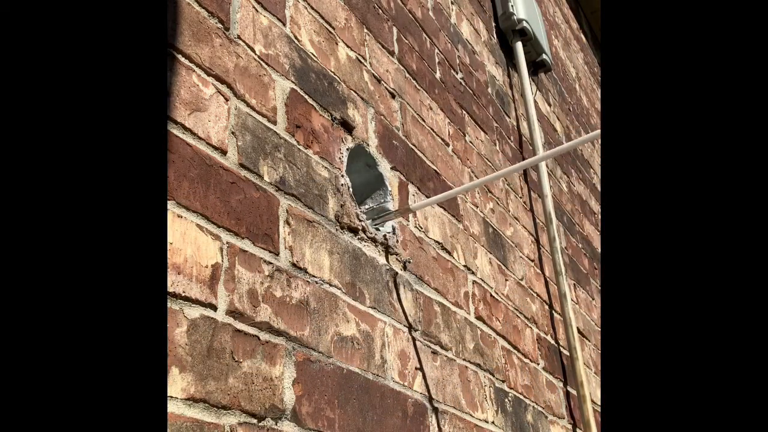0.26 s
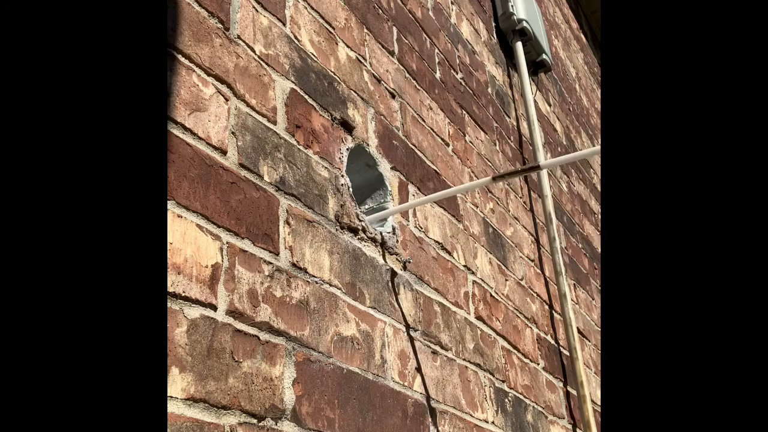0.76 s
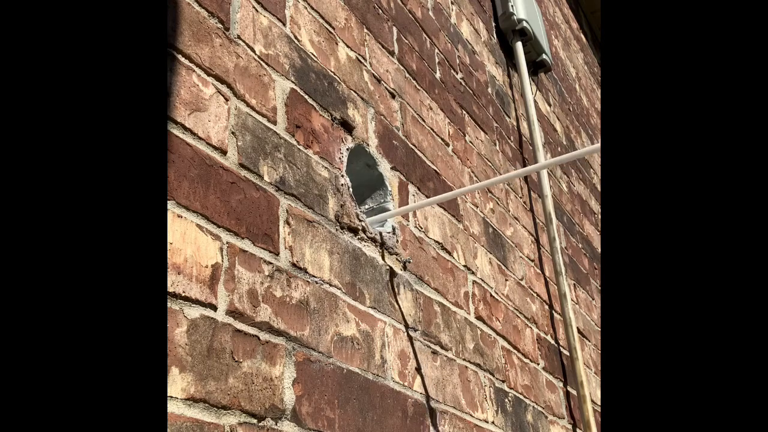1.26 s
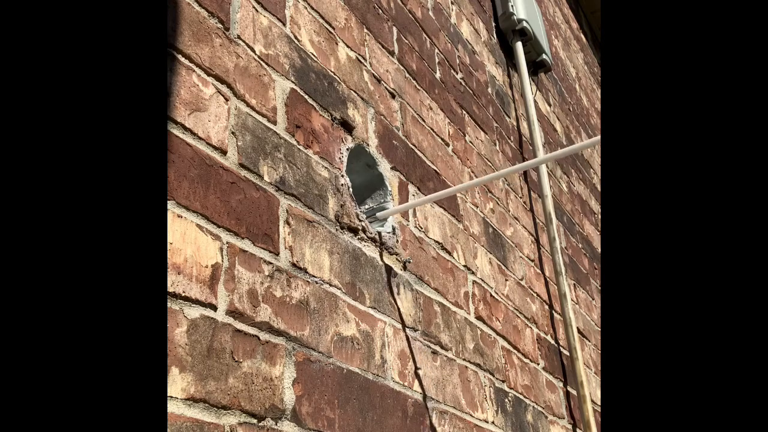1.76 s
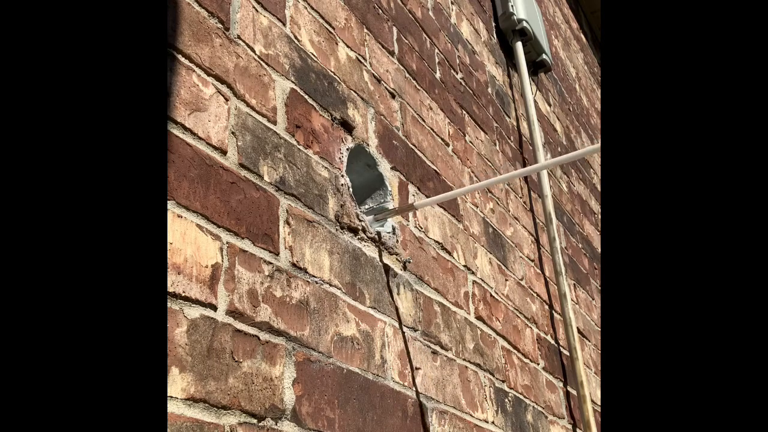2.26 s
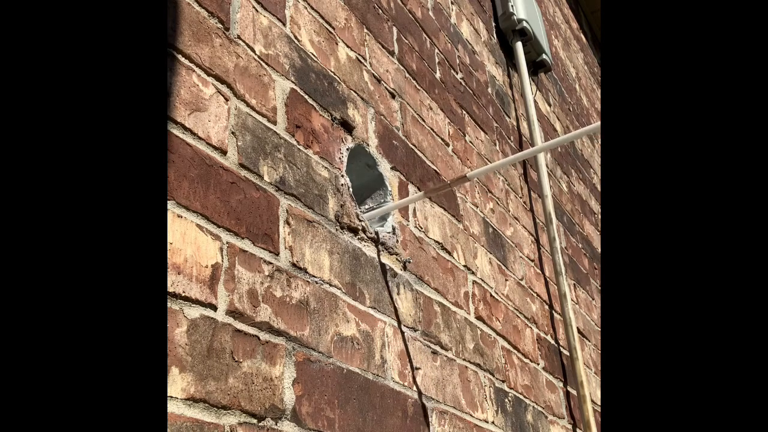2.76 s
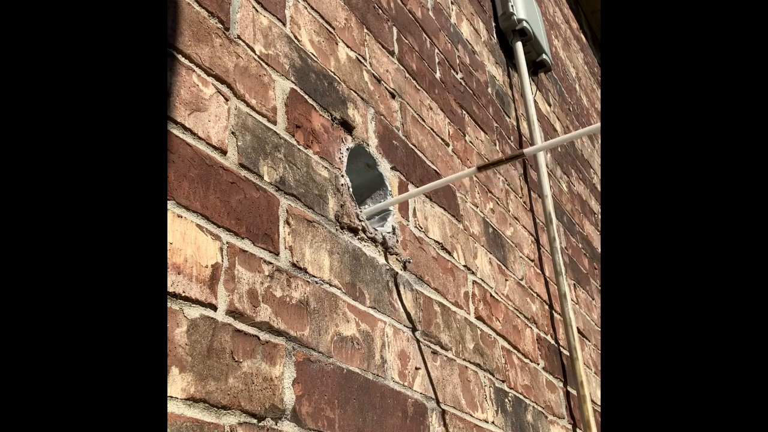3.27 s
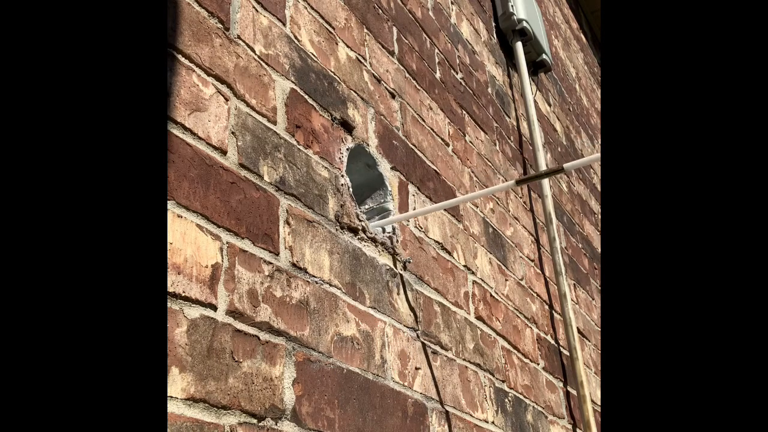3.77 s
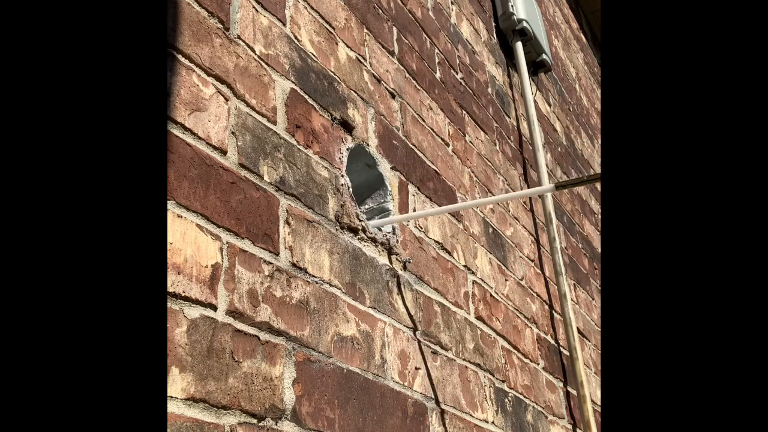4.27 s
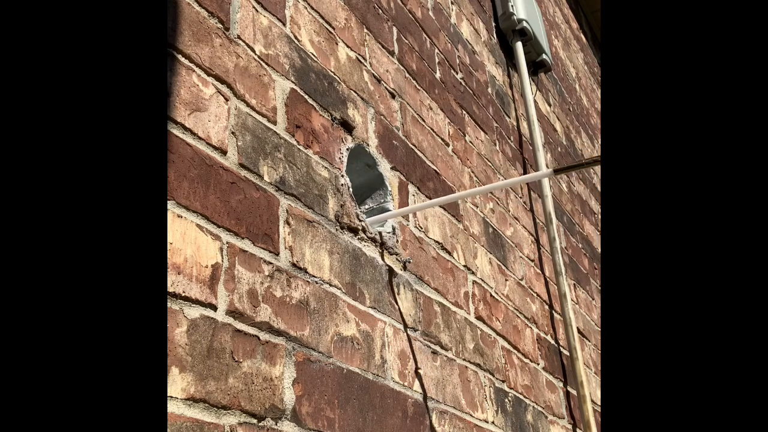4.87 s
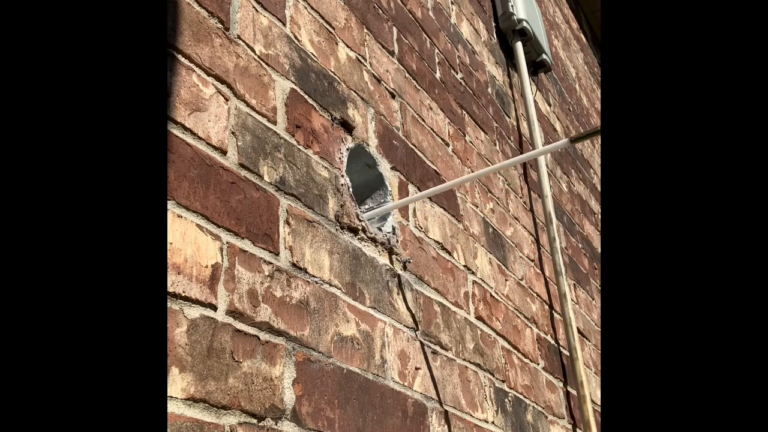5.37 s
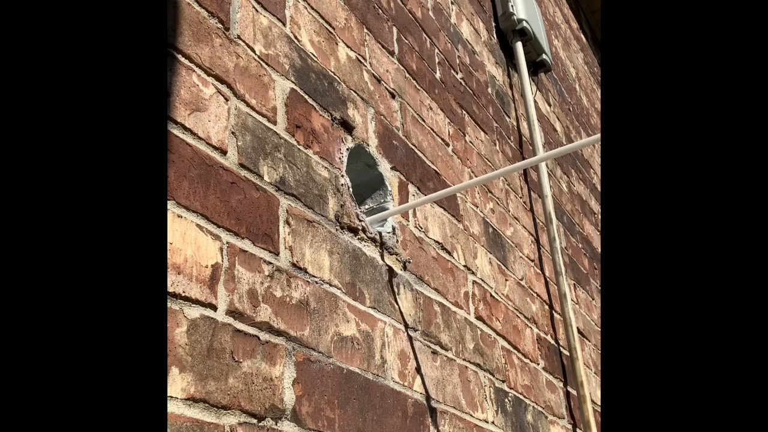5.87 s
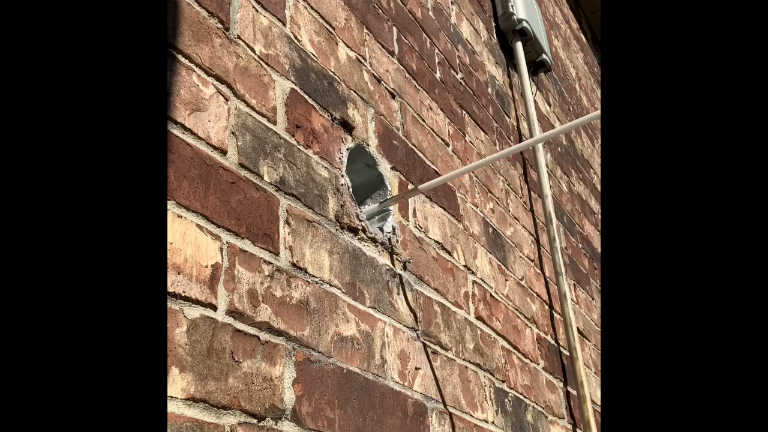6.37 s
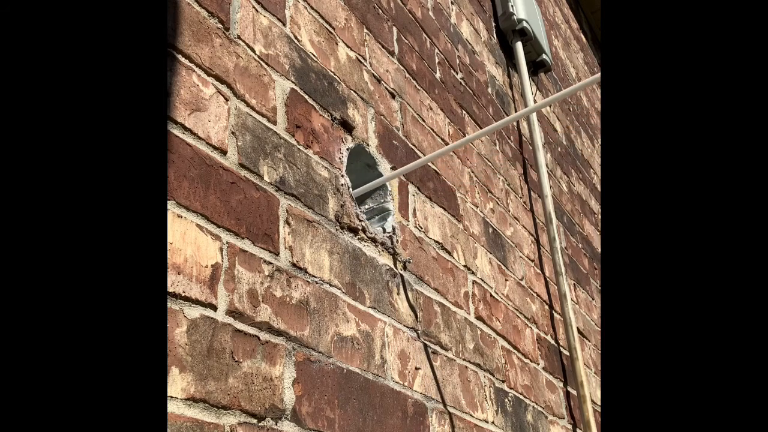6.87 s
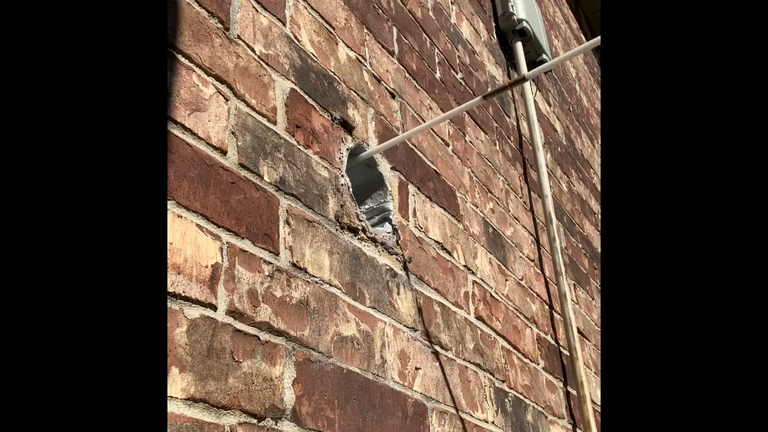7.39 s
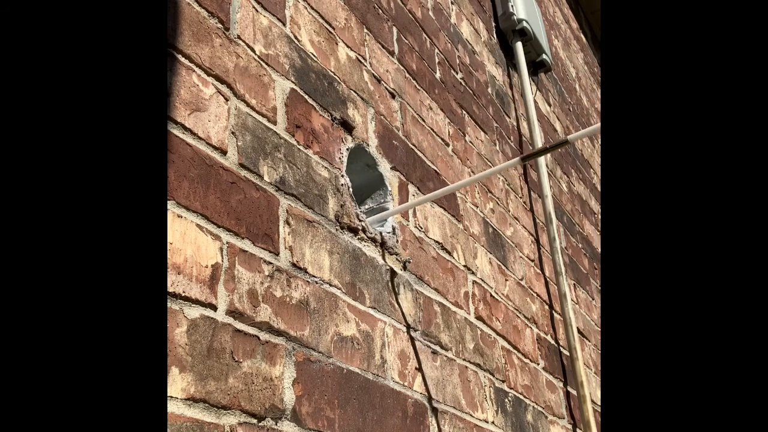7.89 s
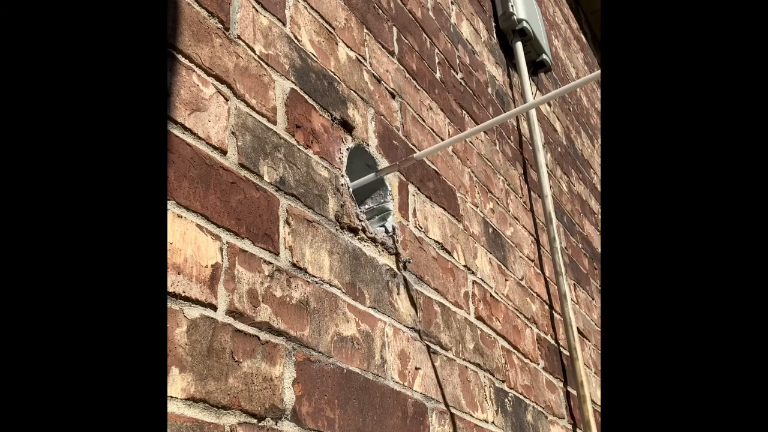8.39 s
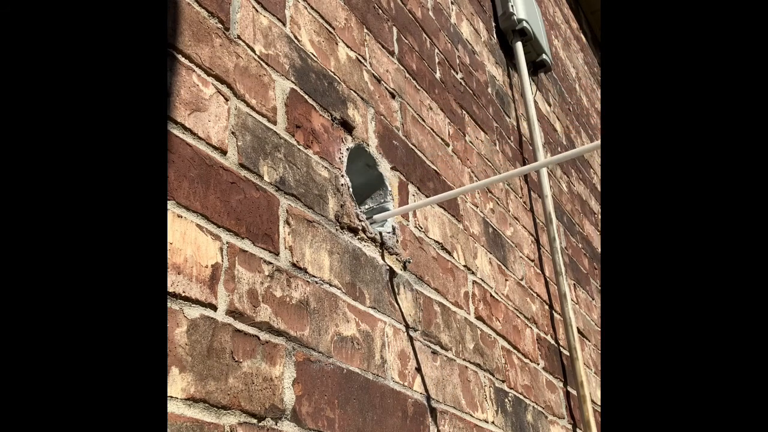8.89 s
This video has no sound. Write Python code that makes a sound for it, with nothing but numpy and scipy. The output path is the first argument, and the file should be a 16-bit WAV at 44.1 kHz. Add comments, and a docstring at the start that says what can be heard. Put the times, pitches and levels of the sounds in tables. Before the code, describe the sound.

A rough, geared drill whine turns a scraping brush in a wall duct, winds down and stops, leaving sparse knocks, rustles and bird calls.

```python
"""Drill gears whine and grind at once, harder once per turn of the chuck, over duct rumble and background.
Whine: harmonics of the tooth rate. Bristle hiss, grinding, boom, rumble and background: shaped noise.
Grit: noise bursts and ringing modes on the duct wall. The drill slows and stops at 4.5 s.
Then the slack rod knocks and taps (bursts and modes), something rustles (noise grains),
and birds call (gliding sines with a weak octave, echoing off houses)."""
import sys
import numpy as np
from scipy import signal
from scipy.fft import rfft, irfft, next_fast_len
from scipy.io import wavfile
from scipy.ndimage import uniform_filter1d

SR = 44100
rng = np.random.default_rng(int(sys.argv[2]) if len(sys.argv) > 2 else 0)


def unload_wav(signal):
    """Save mono or channel-first audio to the path in sys.argv[1] as 16-bit WAV at rate SR, clipped to [-1, 1]."""
    wavfile.write(
        sys.argv[1],
        SR,
        np.round(np.clip(np.atleast_2d(signal).T, -1, 1) * 32767).astype(np.int16),
    )


N = 403074
T = np.arange(N) / SR
SIZE = next_fast_len(N, True)
FREQS = np.fft.rfftfreq(SIZE, 1 / SR)


def undb(db):
    """Decibels to gain."""
    return 10 ** (np.asarray(db) / 20)


def unit(x):
    """Scale to rms 1."""
    return x / np.sqrt(np.mean(x ** 2))


def curves(table):
    """Each column of a timed table, joined by straight lines."""
    s, *columns = np.transpose(table)
    return [np.interp(T, s, column) for column in columns]


def ramp(start_s, length_s):
    """Rise from 0 to 1."""
    return np.clip((T - start_s) / length_s, 0, 1)


def spectrum(points):
    """Gain per frequency from (frequency [Hz], level [dB]) points."""
    hz, db = np.transpose(points)
    return undb(np.interp(np.log(FREQS + 1), np.log(hz), db))


def colour(x, points):
    """Filter to a spectrum with a causal, minimum-phase response."""
    cepstrum = irfft(np.log(spectrum(points)), SIZE)
    cepstrum[1:SIZE // 2] *= 2
    cepstrum[SIZE // 2 + 1:] = 0
    response = np.exp(rfft(cepstrum))
    return irfft(rfft(x, SIZE) * response, SIZE)[:N]


def noise(points):
    """Smooth noise of a given spectrum, rms 1."""
    return unit(colour(rng.standard_normal(N), points))


def walk(rate_hz):
    """Random wandering at rate_hz changes a second, rms 1."""
    knots = rng.standard_normal(N // 4)
    return unit(np.interp(T * rate_hz, np.arange(len(knots)), knots))


def grains(rate_hz, spread_db):
    """Tiny impacts of unequal size at random times, rms 1."""
    sizes = undb(spread_db * np.minimum(rng.exponential(size=N), 4))
    hits = rng.random(N) < rate_hz / SR
    return unit(hits * sizes * rng.standard_normal(N))


def bursts(times, dbs, t60, tail_db, tail_t60):
    """Noise bursts with a fast rise, each with a weak, longer tail of reflections."""
    envelope = np.zeros(N)
    age = T[:SR // 2]
    decay = undb(-60 * age / t60) + undb(tail_db - 60 * age / tail_t60)
    shape = decay * (1 - np.exp(-age / 0.00078))
    for s, db in zip(times, dbs):
        part = envelope[int(s * SR):][:len(age)]
        part += undb(db) * shape[:len(part)]
    return envelope * rng.standard_normal(N)


def ring(times, dbs, modes):
    """Blows on decaying modes; each blow lands on a slightly different spot."""
    hz, db, t60 = np.transpose(modes)[:, :, None]
    out, age = np.zeros(N), T[:SR // 2]
    shapes = undb(db - 60 * age / t60) * np.sin(2 * np.pi * hz * age)
    spots_db = rng.standard_normal((len(times), len(modes)))
    for s, blow_db, spot_db in zip(times, dbs, spots_db):
        part = out[int(s * SR):][:len(age)]
        part += (undb(blow_db + spot_db) @ shapes)[:len(part)]
    return out


def resonate(x, peaks):
    """Lift a signal at fixed resonances, rms 1."""
    response = 1 + sum((undb(db) - 1) / (1 + 2j * (FREQS - hz) / width) for hz, width, db in peaks)
    return unit(irfft(rfft(x, SIZE) * response, SIZE)[:N])


def throb(turns, depth_db):
    """The bent rod loads the gears once a turn, unevenly; mean power stays near 1."""
    load = np.cos(2 * np.pi * turns) + .42 * walk(35)
    gain = undb(depth_db * load)
    return gain / np.sqrt(uniform_filter1d(gain ** 2, size=SR // 5))


# drill speed before the swing within each turn: (time [s], tooth rate [Hz])
SPEED = [(0, 1080), (.57, 1079), (.65, 1137), (1.04, 1172), (1.27, 1190), (1.4, 1152), (1.72, 1135),
         (2.06, 1066), (2.3, 1061), (2.51, 867), (2.7, 743), (3.06, 634.4), (3.48, 629), (3.66, 666.5),
         (3.87, 627.3), (4.07, 467.4), (4.25, 413), (4.46, 273)]
FULL_SPEED_HZ = 1130
RELEASE_S, RELEASE_LENGTH_S = 3.88, .04  # trigger let go
HISS_DB, HISS_DB_PER_OCTAVE, HISS_DROP_DB = -35.5, 7.5, 7  # at full speed; per octave of speed; on release


def effort():
    """What the trigger sets: (tooth rate [Hz], octaves from full speed, coasting [0-1], hiss [dB])."""
    hz, = curves(SPEED)
    octaves = np.log2(hz / FULL_SPEED_HZ)
    coasting = ramp(RELEASE_S, RELEASE_LENGTH_S)
    hiss_db = HISS_DB + HISS_DB_PER_OCTAVE * octaves - HISS_DROP_DB * coasting
    return hz, octaves, coasting, hiss_db


# rod winds up and lags behind the chuck: (time [s], lag [turns])
TWIST = [(0, 0.5), (.45, 0.3), (.9, 0.28), (1.2, 0.14), (1.55, 0.27), (1.82, 0.29), (2.2, 0.19), (2.6, .2),
         (2.95, 0.15), (3.3, 0.21), (3.75, .13)]
TEETH_PER_TURN = 61.4
SAG, BACKLASH = 0.0066, .003  # speed swing once a turn; random, per walk; shares of speed


def rotation(hz):
    """Rod turns and tooth phase [rad]: the motor sags under the rod, backlash shakes the teeth."""
    twist, = curves(TWIST)
    turns = np.cumsum(hz) / SR / TEETH_PER_TURN - twist
    sag = -SAG * np.sin(2 * np.pi * turns) + BACKLASH * (walk(60) + walk(500))
    mesh = 2 * np.pi * np.cumsum(hz * (1 + sag)) / SR
    return turns, mesh


def tooth_line(order, mesh, coasting, rough, smear_rad=0):
    """Sine at a multiple of the tooth rate, strength and phase wandering; steadier when coasting."""
    strain = 1 - .15 * coasting
    tone = np.sin(order * mesh + strain * smear_rad * walk(260))
    return np.sqrt(2 / (1 + rough ** 2)) * tone * (1 + strain * rough * walk(220))


# harmonics 1-4: (base level at full speed [dB], slope [dB per octave of speed], roughness [ratio])
HARMONICS = [(-40, 1.5, 0.29), (-33, 4.5, 0.49), (-34, 9, 0.48), (-51.5, 4.5, 0.26)]
# level shift of harmonic 1 over time: (time [s], level [dB])
FIRST_SHIFT = [(0, -1.5), (.55, -0.5), (1.05, -5.5), (1.3, 2.5), (1.66, -15), (1.78, 3), (2.2, -3),
               (2.85, 2.5), (3.1, 0), (3.45, 2), (3.7, -5.5), (3.87, 5.5), (4.05, 0)]
# level shifts of harmonics 2 and 3 over time: (time [s], second [dB], third [dB])
UPPER_SHIFT = [(0, 4.5, -8.5), (.3, 7.5, -3.5), (.8, 2.5, -13.5), (1.05, -1, -4.5), (1.3, -4, -2.5),
               (1.5, 1.5, -9), (1.7, -6, 3), (1.85, 10, 0), (2.2, -7, 3.5), (2.33, -6, -7.5),
               (2.52, -1, 1.5), (2.66, -1, 4), (2.85, 3.5, 0), (3.1, -1, -7), (3.7, 1, 2), (4.05, -1.5, 5),
               (4.35, 7.5, 14)]
# how strongly the drill radiates a tone: (frequency [Hz], level [dB])
RADIATION = [(330, -19), (440, 2.5), (560, 1), (632, 0), (665, -10), (770, -13), (850, 1.5), (990, 6.5),
             (1075, 2), (1160, 1.5), (1270, -2.5), (1450, 0.5), (1900, -0.5), (2160, -3.5), (2330, -5.5),
             (2550, 5.5), (3150, 3.5), (3390, 8.5), (3570, 9.5), (3850, 10), (4300, 16), (4520, -8.5)]
# weak smeared gearbox lines: (multiple of tooth rate [ratio])
OVERTONES = [1.7, 3.25, 3.65, 4, 5, 6, 7.9, 8.05]
# relative level of each overtone: (level [dB])
OVERTONE_LEVELS = [-9, -4, -7.5, 1.5, 1.5, -1, -8.5, -11.5]
# gear housing and rod resonances: (frequency [Hz], width [Hz], lift [dB])
HOUSING = [(1086, 15, 4.5), (1350, 16, 14), (1540, 24, 0.5), (1886, 21, 13.5), (2540, 90, 7.5),
           (3502, 75, 11.5), (8800, 590, 8.5)]
# high singing of motor and gears: (multiple of tooth rate [ratio], relative level [dB])
SINGING = [(6, -9), (7.17, 0), (8, -2)]
# casing resonances: (frequency [Hz], width [Hz], lift [dB])
CASING = [(7050, 300, 7), (8330, 330, 17), (8650, 200, 10)]
# level at full speed, slope with speed
OVERTONE_DB, OVERTONE_DB_PER_OCTAVE = -37, -0.5
SINGING_DB, SINGING_DB_PER_OCTAVE = -45, 10
SIDEBAND_ORDER, SIDEBAND_DB, SIDEBAND_DB_PER_OCTAVE = 7 / 8, -48.5, 48  # just under the tooth rate
HARMONIC_SMEAR_RAD, OVERTONE_SMEAR_RAD, SINGING_SMEAR_RAD = .045, 1.3, .8  # harmonics: times order squared
THROB_DB, SECOND_THROB_DB, THIRD_DIP = 2.5, 2.4, .85  # once a turn; dip is a 0-1 depth
WHINE_DROP_DB, WHINE_RECOVERY_DB_PER_S = 8, 2.5  # drop on release, slowly shrinking
UNMESH_S, UNMESH_DB = 4.15, 22  # final fade of the whine, complete at the stop
STOP_S, STOP_LENGTH_S = 4.5, .13


def gear_whine(hz, octaves, coasting, turns, mesh):
    """Meshing teeth sound the tooth rate, its harmonics and off-harmonic lines, lifted by resonances."""
    load = throb(turns, THROB_DB)
    radiation_hz, radiation_db = np.transpose(RADIATION)
    release_drop_db = coasting * (WHINE_DROP_DB - WHINE_RECOVERY_DB_PER_S * (T - RELEASE_S))

    def driven(db, slope_db):
        """Gain that follows speed and drops on release."""
        return undb(db + slope_db * octaves - release_drop_db)

    harmonics = []
    for order, (db, slope_db, rough) in enumerate(HARMONICS, 1):
        line = tooth_line(order, mesh, coasting, rough, HARMONIC_SMEAR_RAD * order ** 2)
        radiated = undb(np.interp(order * hz, radiation_hz, radiation_db))
        harmonics.append(line * driven(db, slope_db) * radiated)
    first, second, third, fourth = harmonics

    first_db, = curves(FIRST_SHIFT)
    second_db, third_db = curves(UPPER_SHIFT)
    whine = first * undb(first_db + 1.4 * walk(25) + 1.0 * walk(76))
    whine += second * undb(second_db) * throb(turns, SECOND_THROB_DB)
    whine += third * undb(third_db) * unit(1 - THIRD_DIP * np.sin(np.pi * turns) ** 4)
    whine += fourth * load

    sideband = tooth_line(SIDEBAND_ORDER, mesh, coasting, rough=0.65)
    whine += driven(SIDEBAND_DB, SIDEBAND_DB_PER_OCTAVE) * sideband
    overtones = sum(undb(db) * tooth_line(order, mesh, coasting, .88, OVERTONE_SMEAR_RAD)
                    for order, db in zip(OVERTONES, OVERTONE_LEVELS))
    whine += driven(OVERTONE_DB, OVERTONE_DB_PER_OCTAVE) * resonate(overtones, HOUSING) * load
    singing = sum(undb(db) * tooth_line(order, mesh, coasting, .8, SINGING_SMEAR_RAD)
                  for order, db in SINGING)
    whine += driven(SINGING_DB, SINGING_DB_PER_OCTAVE) * resonate(singing, CASING) * load
    return whine * undb(-UNMESH_DB * ramp(UNMESH_S, STOP_S - UNMESH_S))


# grinding as the rod binds: (time [s], level [dB])
GRINDING = [(0, -38), (.3, -41.5), (.5, -34.5), (.8, -36), (1.7, -36), (2.3, -35.5), (2.45, -35),
            (3.1, -30.5), (3.27, -37), (3.78, -36), (3.87, -48), (3.92, -44), (4.22, -44.5), (4.4, -52)]
# once-a-turn swing of the grinding: (time [s], depth [dB])
SWING = [(0, 3.5), (.55, 2), (2.9, 2), (3.35, 5.5), (3.65, 2.5), (3.9, 4), (4.05, 1.5)]
# grinding spectrum before the housing: (frequency [Hz], relative level [dB per Hz])
GRIND = [(400, -22), (750, -14), (950, -4), (1200, -11), (1450, 1), (1900, -4), (2200, 2), (2600, 4),
         (3000, 3.5), (3500, -2), (3900, -0.5), (4400, -20), (5000, -4.5), (7000, -18)]
CHATTER_DB, CHATTER_S = -2.5, .002  # relative to the fine grinding; decay constant


def grinding(mesh, turns):
    """Fine grinding of teeth and coarse chatter of the rod, noise surging once a turn."""
    fine = grains(rate_hz=5900, spread_db=3.5) * (1 + 0.087 * np.cos(mesh))
    decay = np.exp(-T[:SR // 20] / CHATTER_S)
    power = signal.fftconvolve(grains(rate_hz=260, spread_db=2.5) ** 2, decay)[:N].clip(0)
    chatter = unit(power ** .5 * rng.standard_normal(N))
    ground = resonate(colour(fine + undb(CHATTER_DB) * chatter, GRIND), HOUSING)
    level_db, = curves(GRINDING)
    swing_db, = curves(SWING)
    return undb(level_db) * ground * throb(turns, swing_db)


# bristle spectrum: (frequency [Hz], relative level [dB per Hz])
HISS = [(3500, -17), (5000, -21.5), (5600, 1.5), (6500, 0), (7300, -2), (8600, 3), (10000, -0.5),
        (11500, -1.5), (13000, -11), (14500, -11.5), (15500, -25)]
HISS_THROB_DB = 1.5


def bristles(hiss_db, turns):
    """Scraping bristles: smooth noise plus grains, louder with speed, throbbing once a turn."""
    coarse = unit(colour(grains(rate_hz=1400, spread_db=5.0), HISS))
    hiss = 0.79 * noise(HISS) + 0.51 * coarse
    return undb(hiss_db) * hiss * throb(turns, HISS_THROB_DB)


# duct boom spectrum: (frequency [Hz], relative level [dB per Hz])
BOOM = [(25, -49), (45, -24.5), (70, 0.5), (100, 10.5), (130, 7), (170, 0), (260, -47.5)]
# rod rumble spectrum: (frequency [Hz], relative level [dB per Hz])
RUMBLE = [(40, -45.5), (100, -27.5), (160, -3), (205, 0), (280, -3.5), (400, -10), (600, -16.5), (800, -14),
          (1200, -51.5)]
# rod whips, shaking the duct: (peak time [s], length [s], boom lift [dB], rumble lift [dB])
WHIPS = [(0.1, 0.21, -4, 7), (1.135, 0.14, 5.5, -3.5), (1.66, 0.74, 4, 8), (2.193, 0.5, -0.5, 11),
         (3.155, 0.4, 7, -0.5), (3.553, 0.094, 1, -5.5), (4.32, 0.092, 3, 4.5)]
BOOM_DB = -42  # between whips
RUMBLE_DB, RUMBLE_DB_PER_OCTAVE = -42, 4.5  # at full speed, between whips


def duct(octaves):
    """The duct booms, the rod rumbles more with speed; each whip shifts both levels."""
    boom_db = BOOM_DB
    rumble_db = RUMBLE_DB + RUMBLE_DB_PER_OCTAVE * octaves
    for s, length_s, boom_lift_db, rumble_lift_db in WHIPS:
        swell = np.sin(np.pi * ramp(s - length_s / 2, length_s))
        boom_db = boom_db + boom_lift_db * swell
        rumble_db = rumble_db + rumble_lift_db * swell
    boom = undb(boom_db) * noise(BOOM)
    rumble = undb(rumble_db) * noise(RUMBLE) * undb(2 * walk(25))
    return boom + rumble


def drill():
    """Gears, bristles and duct share one rotation and fade out at the stop: (whine, noises)."""
    hz, octaves, coasting, hiss_db = effort()
    turns, mesh = rotation(hz)
    whine = gear_whine(hz, octaves, coasting, turns, mesh)
    noises = grinding(mesh, turns) + bristles(hiss_db, turns) + duct(octaves)
    running = 1 - ramp(STOP_S - STOP_LENGTH_S, STOP_LENGTH_S)
    return running * whine, running * noises


# background spectrum: (frequency [Hz], relative level [dB per Hz])
BACKGROUND = [(25, -34.5), (45, -2.5), (90, 1.5), (170, -11.5), (330, -23), (650, -27.5), (1100, -49),
              (1900, -46), (2700, -35), (4500, -53.5), (5900, -32.5), (7400, -60.5), (9700, -47),
              (12500, -63)]
BACKGROUND_DB = -47


def background():
    """Low rumble as of far traffic, faint hiss bands near 2.7, 5.9 and 9.7 kHz; level slowly wandering."""
    return undb(BACKGROUND_DB + 1.2 * walk(2.7)) * noise(BACKGROUND)


def air():
    """Faint low noise, independent in each channel."""
    points = [(60, -4.0), (250, 6.5), (600, 0.5), (1200, -14.0), (3000, -50.0), (12000, -60.0)]
    return undb(-61.5) * np.array([noise(points) for _ in range(2)])


CRUMB_CLACK_DB, CRUMB_TICK_DB, CRUMB_SPREAD_DB = 6.5, 13, 10  # first two relative to the hiss


def crumbs(count):
    """Small bits at random times before release, levels scattered about the hiss: rows like GRIT."""
    s = RELEASE_S * rng.random(count)
    hiss_db = effort()[-1]
    clack_db, tick_db = np.interp(s, T, hiss_db) + CRUMB_SPREAD_DB * rng.standard_normal((2, count))
    return np.column_stack([s, clack_db + CRUMB_CLACK_DB, tick_db + CRUMB_TICK_DB])


# larger grit flicked by the brush, and the loudest clacks where the rod strikes the duct: (time [s], clack [dB
# before trim], tick [dB])
GRIT = [(.0378, -10.5, -21), (.076, -28, -25), (.1003, -10, -17), (.383, -37, -15), (.443, -36.5, -13.5),
        (.517, -14.5, -26), (.564, -23, -15.5), (.629, -27, -26), (.723, -29, -28), (.889, -11.5, -17),
        (1.013, -22, -17), (1.051, -20, -32), (1.107, -19, -26), (1.408, -10, -16.5), (1.475, -36.5, -23),
        (1.753, -42, -16), (2.145, -12, -20), (2.619, -28.5, -36), (2.745, -27, -18.5), (2.812, -21, -34),
        (2.862, -16, -18), (3.212, -18, -20), (3.323, -32, -16.5), (3.381, -17, -41), (3.478, -18, -37),
        (3.516, -18, -19.5), (3.601, -23, -19), (3.682, -13.5, -32), (3.716, -17.5, -20),
        (3.856, -14.5, -36), (3.875, -18, -18), (3.974, -34, -19.5), (4.064, -37, -28), (4.174, -23, -31.5)]
# short modes of the duct wall: (frequency [Hz], relative level [dB], t60 [s])
CLACK = [(1480, -9, .018), (1920, 0, .019), (2500, -15, .01), (8400, -12, .006)]
# crack spectrum: (frequency [Hz], level [dB])
CRACK = [(300, -17), (1000, -12.5), (1800, 2.5), (2700, 3), (4200, -12), (6000, -14), (9000, -34.5),
         (15000, -31)]
# tick spectrum: (frequency [Hz], level [dB])
TICK = [(1500, -30), (4000, -15), (8000, 2), (11000, -1.5), (15500, -12.5)]


def grit():
    """Mortar and lint, and at times the rod itself, clack on the duct wall (modes, noise) and tick on the rod
    (short bursts)."""
    s, clack_db, tick_db = np.vstack([GRIT, crumbs(count=5)]).T
    modes = ring(s, clack_db - 4.5, CLACK)
    cracks = colour(bursts(s, clack_db - 4, t60=0.05, tail_db=-30.0, tail_t60=0.28), CRACK)
    ticks = colour(bursts(s, tick_db, t60=0.018, tail_db=-21.5, tail_t60=.05), TICK)
    return modes + cracks + ticks


# slack rod, levels before trims:
# (time [s], crack [dB], metal ring [dB], thud [dB], tick [dB], tock on brick [dB])
KNOCKS = [(4.396, -22, -38, -50, -29, -39), (4.422, -32.5, -33.5, -41, -31, -47),
          (4.439, -34, -42, -43, -46, -47), (5.07, -27.5, -44, -37, -42, -60),
          (5.153, -20, -32, -34, -31, -57), (5.84, -38, -56, -43, -70, -64),
          (6.201, -41.5, -55, -29, -39, -44), (7.222, -23, -52, -26, -48, -62),
          (7.246, -39, -55, -38.5, -64, -59), (7.558, -65, -81, -41, -73, -31.5),
          (8.579, -65.5, -61, -61, -38, -71), (8.695, -15, -41.5, -14.5, -19, -28),
          (8.706, -51, -42, -20, -36, -32), (8.779, -37, -45, -32, -50, -60),
          (8.867, -41, -52.5, -30, -53, -47), (8.913, -41, -50, -26.5, -52, -42)]
# metal coupling modes: (frequency [Hz], relative level [dB], t60 [s])
METAL = [(1520, 4.5, 0.14), (1830, 4.5, 0.31), (1874, 16, 0.092), (2623, 13, 0.04), (3120, -25, 0.097),
         (5660, 4.5, 0.054), (7500, 3, 0.04)]
# brick rim modes: (frequency [Hz], relative level [dB], t60 [s])
RIM = [(1020, -14.5, 0.037), (1384, -7, 0.052), (1430, -12.5, 0.045), (1658, -37, 0.031)]
# thud spectrum: (frequency [Hz], level [dB])
THUD = [(80, -23), (200, -7), (330, -2), (420, -3.5), (520, -9), (680, -2), (900, -12.5), (1600, -55)]
# one thin ping: (frequency [Hz], relative level [dB], t60 [s])
PING = [(5600, 0, .025)]
# one hollow rebound: (frequency [Hz], relative level [dB], t60 [s])
THUMP = [(385, 0, .045), (650, -7, .03)]
PING_S, PING_DB = 6.199, -38
THUMP_S, THUMP_DB = 8.7065, -25


def knocks():
    """The rod drops on the rim: crack, tick and duct thud as noise; coupling and brick as modes."""
    s, crack_db, metal_db, thud_db, tick_db, tock_db = np.transpose(KNOCKS)
    crack = colour(bursts(s, crack_db - 0.5, t60=0.04, tail_db=-14, tail_t60=0.17), CRACK)
    crack += ring(s, crack_db - 19.5, CLACK)
    tick = colour(bursts(s, tick_db, t60=0.012, tail_db=-27, tail_t60=0.082), TICK)
    thud = colour(bursts(s, thud_db, t60=0.13, tail_db=-18.5, tail_t60=0.6), THUD)
    metal = ring(s, metal_db - 14.5, METAL)
    tock = ring(s, tock_db - 1.5, RIM)
    ping = ring([PING_S], [PING_DB], PING)
    thump = ring([THUMP_S], [THUMP_DB], THUMP)
    return crack + tick + thud + metal + tock + ping + thump


# spells of faint tapping: (start [s], length [s], relative level [dB])
TAPPING = [(4.5, 1.8, -79), (7.25, 1.85, -79)]
# tap spectrum: (frequency [Hz], relative level [dB per Hz])
TAP = [(150, -34), (500, -9), (900, -6), (1400, -0.5), (1900, -6), (3000, -7), (8000, -32.5)]


def taps():
    """The slack rod taps faintly while moved: sparse short noise touches."""
    moving = sum(undb(db) * (ramp(s, .05) - ramp(s + length_s, .05)) for s, length_s, db in TAPPING)
    touches = uniform_filter1d(grains(rate_hz=16, spread_db=1.5), size=600) * rng.standard_normal(N)
    return moving * unit(colour(touches, TAP))


OCTAVE_DB_PER_OCTAVE = 45  # octave fades as pitch falls below the note's highest


def bird(note, calls, waver, octave_db):
    """Whistled note, a gliding sine with a weak octave, repeated with unsteady pitch and strength."""
    age, hz, db = np.transpose(note)
    out, wobble = np.zeros(N), 1 + waver * walk(350)
    for s, call_db in calls:
        now = (T >= s) & (T < s + age[-1])
        pitch = np.interp(T[now] - s, age, hz) * wobble[now]
        phase = 2 * np.pi * np.cumsum(pitch) / SR
        octave = undb(octave_db + OCTAVE_DB_PER_OCTAVE * np.log2(pitch / hz.max()))
        gain = undb(call_db + np.interp(T[now] - s, age, db))
        out[now] += gain * (np.sin(phase) + octave * np.sin(2 * phase))
    return out * undb(2.5 * walk(120))


# slurred note: (time from call start [s], pitch before waver [Hz], relative level [dB])
SLUR = [(0, 2150, -24), (.015, 2202, -11), (.04, 2073, -8), (.05, 2210, -40), (.057, 3570, -23),
        (.068, 3430, -9.5), (.088, 3420, -5.5), (.105, 3090, -9), (.143, 2783, 4), (.16, 2630, 1)]
# slurred calls: (time [s], relative level [dB])
SLURS = [(4.524, -45), (5.292, -46), (5.547, -44), (5.812, -43.5)]


def slurred_calls():
    """Calls that leap up, then slide down."""
    return bird(SLUR, SLURS, waver=0.024, octave_db=-15.5)


# light rubbing: (start [s], length [s], relative level [dB])
RUSTLES = [(6.167, 0.14, -68.5), (7.868, 0.088, -68), (8.324, 0.51, -67.5), (8.412, 0.46, -74),
           (8.661, 0.55, -60)]
# rustle spectrum: (frequency [Hz], relative level [dB per Hz])
RUSTLE = [(900, -1), (2000, 5), (2900, -11), (3600, 7.5), (4600, -15), (6000, 3), (7200, -4), (9000, 4.5),
          (12000, -3.5), (15000, -3)]
# brief rod scuffs: (peak time [s], level [dB])
SCUFFS = [(8.425, -63), (8.458, -53.5), (8.491, -54.5), (8.555, -59), (8.582, -62), (8.605, -65),
          (8.628, -55.5), (8.74, -55), (8.935, -53), (9.1, -59)]
# scuff spectrum: (frequency [Hz], relative level [dB per Hz])
SCUFF = [(1000, -20), (2000, 5), (5000, -10), (7500, -2), (10500, 1), (12500, -20), (15000, -8)]
RUSTLE_ATTACK_S, RUSTLE_RELEASE_S, SCUFF_S = 0.017, 0.043, 0.032


def rustles():
    """Spells of rubbing grains that rise, hold and fade, plus brief noise scuffs of the rod."""
    spells = sum(undb(db) * (ramp(s, RUSTLE_ATTACK_S) - ramp(s + length_s, RUSTLE_RELEASE_S))
                 for s, length_s, db in RUSTLES)
    flicker = undb(1.8 * walk(40))
    rubbing = unit(colour(grains(rate_hz=2500, spread_db=1), RUSTLE))
    scuffs = sum(undb(db) * np.sin(np.pi * ramp(s - SCUFF_S / 2, SCUFF_S)) ** 2 for s, db in SCUFFS)
    return spells * flicker * rubbing + scuffs * noise(SCUFF)


# swooping note: (time from call start [s], pitch before waver [Hz], relative level [dB])
SWOOP = [(0, 2210, 4), (.015, 2290, -18), (.05, 2450, 2), (.07, 2700, -15), (.09, 2970, -2.5),
         (.125, 2620, -8), (.17, 2580, -26)]
# swooping calls: (time [s], relative level [dB])
SWOOPS = [(6.23, -65), (6.57, -68), (6.889, -71), (7.25, -64), (7.62, -61)]
# piped note: (time from call start [s], pitch before waver [Hz], relative level [dB])
PIPE = [(0, 2048, 0), (.018, 2110, -3), (.05, 2173, -9), (.09, 2070, -5), (.125, 1963, -15)]
# piped calls: (time [s], relative level [dB])
PIPES = [(7.22, -62), (7.385, -59.5), (7.565, -55.5), (7.76, -55), (7.95, -55.5), (8.16, -59), (8.34, -58)]


def far_calls():
    """Faint calls: swoops that rise and fall, and lower piped notes."""
    swoops = bird(SWOOP, SWOOPS, waver=0.011, octave_db=-34)
    pipes = bird(PIPE, PIPES, waver=0.0344, octave_db=-44)
    return swoops + pipes


ECHO_S, ECHO_DB = .105, -18


def far_wall(x):
    """One distinct echo from a house across the yard."""
    return undb(ECHO_DB) * np.interp(T - ECHO_S, T, x, left=0)


def houses(x, wet_db, t60):
    """Scattered echoes from walls around: decaying noise, different in each channel."""
    age = T[:SR]
    tail = rng.standard_normal((2, SR)) * undb(-60 * age / t60) * (age > .006)
    tail /= np.sqrt(np.sum(tail ** 2, axis=1, keepdims=True))
    return undb(wet_db) * signal.fftconvolve(x[None], tail, axes=1)[:, :N]


# stereo widening phase, negative where left lags right: (frequency [Hz], left minus right [rad])
WIDENING_PHASE = [(0, 0), (500, -.35), (650, -1.6), (750, -2.3), (850, -4), (950, -5.6), (1080, -6.7),
                  (1300, -8.7), (1400, -11.1), (1500, -12.7), (1650, -13.7), (1900, -14.7), (2150, -14.6),
                  (2500, -15.2), (3400, -14.9), (4500, -15.7), (8000, -18.8), (8900, -18.9), (12300, -21.9),
                  (14500, -22.3), (16000, -25)]
# stereo widening balance: (frequency [Hz], left minus right [dB])
WIDENING_TILT = [(40, 4), (120, 0.5), (300, 3.5), (450, 8.5), (650, -1), (750, 6.5), (950, -10),
                 (1080, 0.5), (1400, 0.5), (2150, 0), (2700, 4), (3450, -2.5), (5000, 0)]


def widen(x):
    """Stereo widening: left lags right by a phase that varies with frequency; level balance varies too."""
    phase = np.interp(FREQS, *np.transpose(WIDENING_PHASE))
    tilt = spectrum(WIDENING_TILT)
    pair = np.array([tilt * np.exp(1j * phase), np.ones(len(FREQS))])
    pair = pair * np.sqrt(2 / (1 + tilt ** 2))  # constant total power
    return irfft(rfft(x, SIZE) * pair, SIZE)[:, :N]


def scene():
    """Drill and rod at the wall, birds and background beyond."""
    whine, scrape = drill()
    rod = knocks() + taps()
    slurs = slurred_calls()
    far_birds = far_calls()
    birds = slurs + far_birds
    # near wall: short tails
    echoes = houses(scrape, wet_db=-9, t60=.05) + houses(whine, wet_db=-11, t60=.04)
    echoes += houses(birds, wet_db=-11, t60=.12) + houses(birds, wet_db=-15, t60=.9)
    echoes += houses(far_wall(slurs), wet_db=0, t60=.25)
    echoes += houses(far_birds, wet_db=-5, t60=.4)
    echoes += houses(rod, wet_db=-25.0, t60=1.0)
    direct = whine + scrape + background() + grit() + rod + rustles() + birds
    return widen(direct) + echoes + air()


TOP_HZ = 15800


def record(dry):
    """Steep elliptic low-pass cuts the top."""
    lowpass = signal.ellip(10, .2, 80, TOP_HZ, fs=SR, output="sos")
    return signal.sosfilt(lowpass, dry)


dry = scene()
out = record(dry)
unload_wav(out)
```